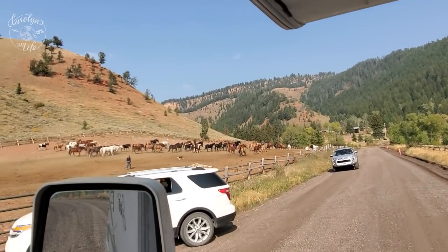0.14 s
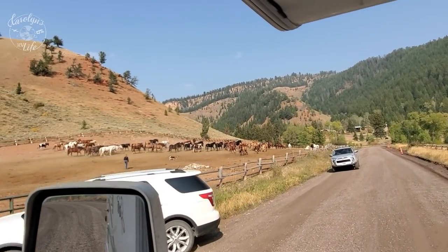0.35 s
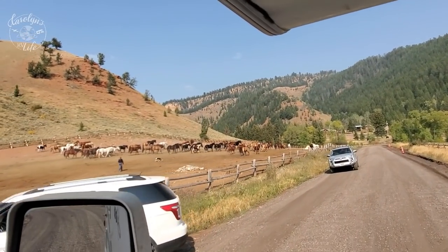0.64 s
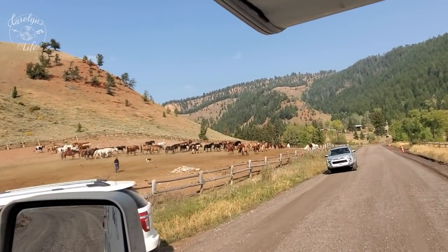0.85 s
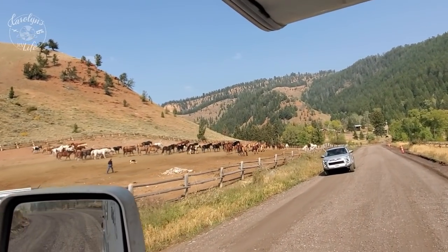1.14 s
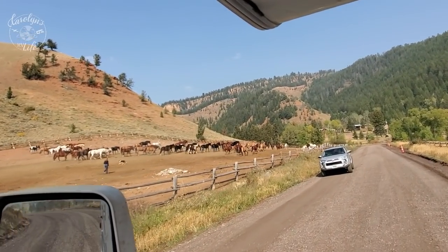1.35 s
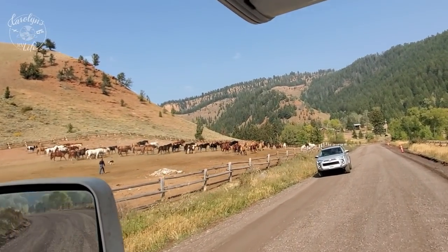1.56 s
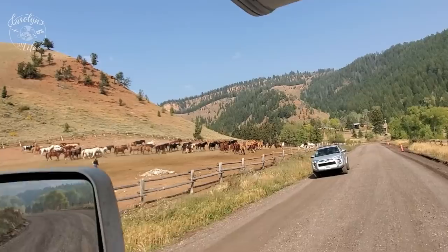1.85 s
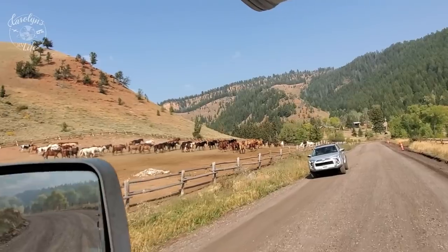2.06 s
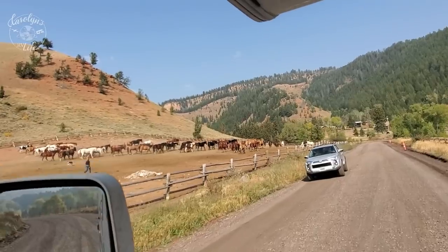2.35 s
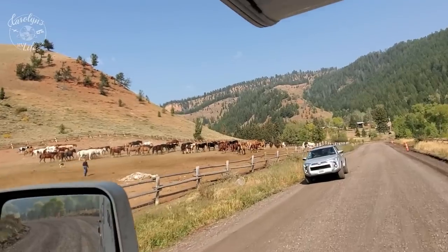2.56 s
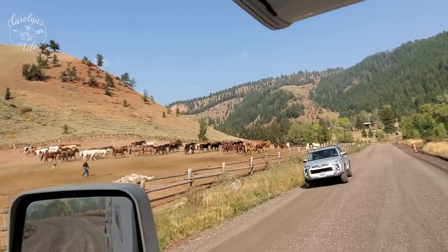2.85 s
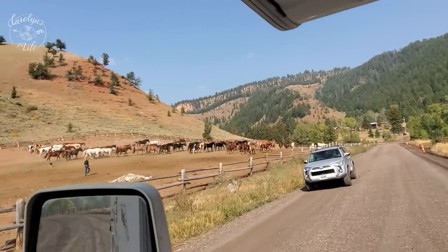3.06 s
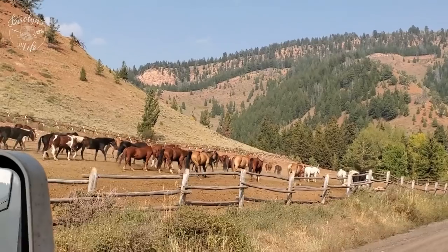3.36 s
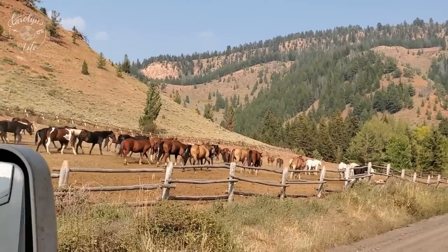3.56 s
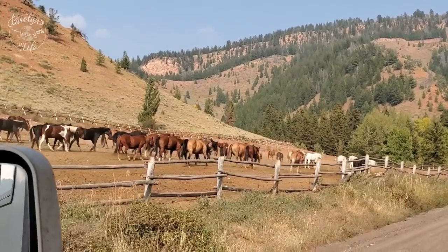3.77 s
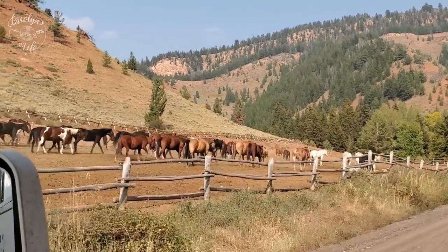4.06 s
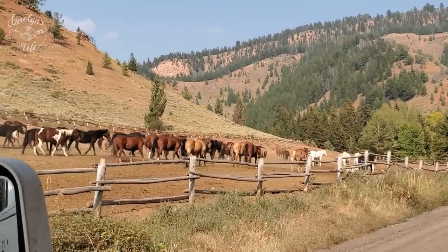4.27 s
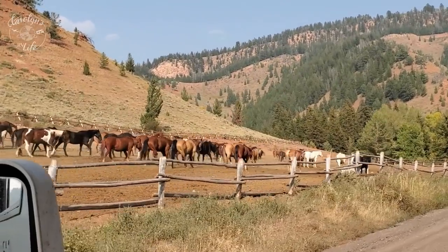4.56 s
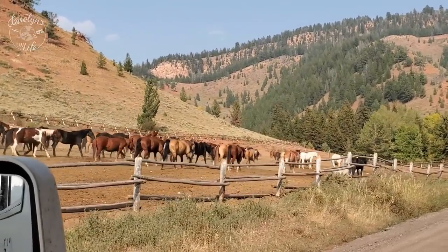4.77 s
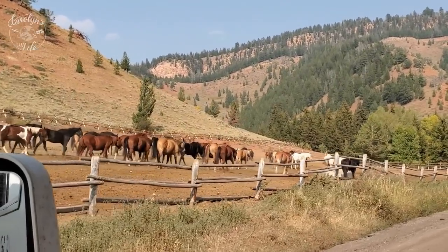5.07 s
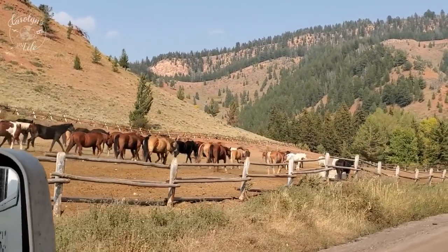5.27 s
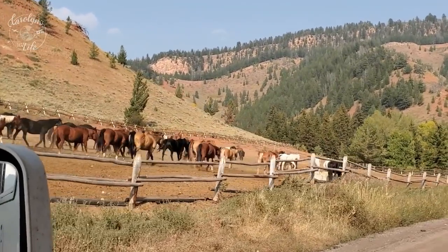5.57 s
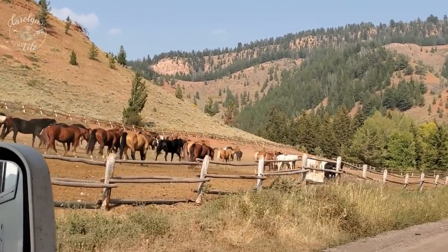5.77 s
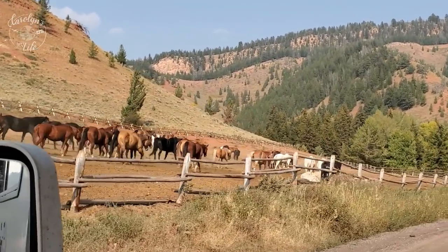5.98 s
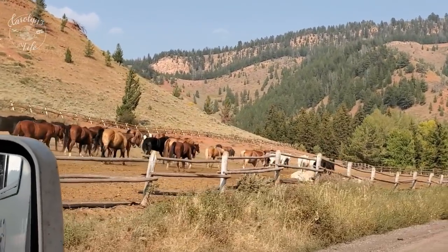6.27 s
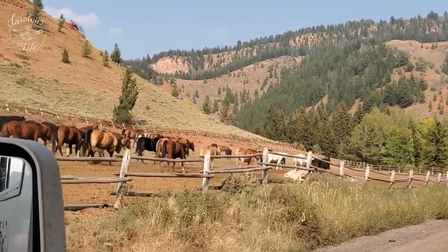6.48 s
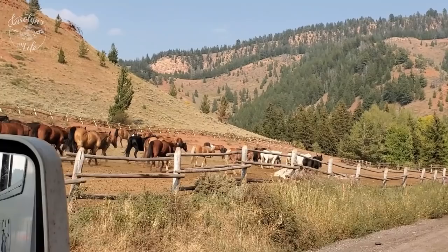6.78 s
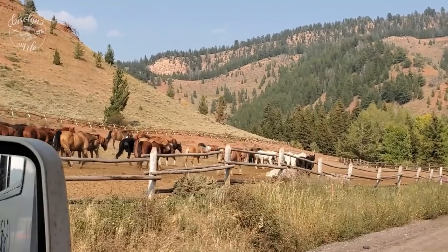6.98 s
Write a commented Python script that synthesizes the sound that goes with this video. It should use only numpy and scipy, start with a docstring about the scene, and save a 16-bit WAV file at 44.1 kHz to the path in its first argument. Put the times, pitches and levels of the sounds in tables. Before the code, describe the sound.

Inside a vehicle cab, a low engine drone and body rumble sit under the crunch and pop of gravel beneath the tyres. The drive starts slowly, with dull thumps and gusts on the microphone through the open window, then the engine swells. After a click, the pace is a little quicker. Nearby trim ticks throughout, and fittings knock and faintly squeak, with one sharp knock near the end.

```python
"""Motorhome cab on a gravel road

From a seat by the open side window, on a two-port stereo microphone. The engine takes up load and booms,
tyres grind over stones, the body thumps and knocks, and loose trim ticks, creaks and squeaks close by.
Gusts through the window buffet the microphone, most of all at the start. At 3.25 s the sound jumps,
with a click, from a crawl to a slightly faster and brighter stretch of road."""
import sys
import numpy as np
from scipy import signal
from scipy.fft import rfft, irfft, next_fast_len
from scipy.io import wavfile
from scipy.ndimage import uniform_filter1d

SR = 44100
rng = np.random.default_rng(int(sys.argv[2]) if len(sys.argv) > 2 else 0)


def digitize_waveform(pressure):
    """Quantize a signal to 16-bit integers and store it at the path in sys.argv[1].

    Rows of a 2-D input are taken as channels; values are limited to [-1, 1].
    """
    field = np.atleast_2d(pressure).T
    bounded = np.clip(field, -1, 1)
    quanta = np.round(bounded * 32767).astype(np.int16)
    wavfile.write(sys.argv[1], SR, quanta)


N = 314595
T = np.arange(N) / SR
SIZE = next_fast_len(N + 4096, True)
FREQS = np.maximum(np.arange(SIZE // 2 + 1) * SR / SIZE, 1)
JUMP_S = 3.25  # the faster stretch begins
CRUISE_HZ = 54  # engine firing rate when cruising
PORT_LAG_S = np.array([[0], [0.00024]])  # sound reaches the left port first


def undb(db):
    """Decibels to gain."""
    return 10 ** (np.asarray(db) / 20)


def unit(x):
    """Scale to rms 1."""
    return x / np.sqrt(np.mean(x ** 2))


def curve(rows):
    """Each column of a table, joined by straight lines in time."""
    times, *columns = np.transpose(rows)
    return [np.interp(T, times, column) for column in columns]


def across(points):
    """Values joined by straight lines on a log-frequency axis."""
    hz, value = np.transpose(points)
    return np.interp(np.log(FREQS), np.log(hz), value)


def colour(x, points):
    """Filter by a spectrum of (frequency [Hz], level [dB]) points."""
    return irfft(rfft(x, SIZE) * undb(across(points)), SIZE)[..., :N]


def walk(rate):
    """Random levels held 1 / rate s and slewed twice; spread near 1."""
    hold = int(SR / rate)
    steps = np.repeat(rng.standard_normal(N // hold + 1), hold)
    return 1.15 * uniform_filter1d(uniform_filter1d(steps, hold), hold)[:N]


def pan(db):
    """Left and right gains for a level difference, left minus right."""
    return undb(np.array([[db], [-db]]) / 2)


def add(track, s, sound):
    """Mix a short sound into a track at time s."""
    i = max(int(s * SR), 0)
    track[..., i:i + sound.shape[-1]] += sound[..., :max(N - i, 0)]


def arrive(track, s, sound):
    """Mix a short sound into both ports, the right one slightly later."""
    pair = np.broadcast_to(sound, (2, sound.shape[-1]))
    for port in range(2):
        add(track[port], s + PORT_LAG_S[port, 0], pair[port])


# Likeness of the two microphone ports: (frequency [Hz], coherence [0-1])
PORT_COHERENCE = [(50, 0.86), (110, 0.79), (170, 0.89), (230, 0.74), (320, 0.92), (620, 0.99), (1000, 0.82),
                  (1500, 0.42), (2500, 0.048), (6000, .03)]
def ports(three_noises):
    """One shared field reaches the left port first; each port also hears its own cab reflections."""
    shared = np.clip(across(PORT_COHERENCE), 0, 1)
    spectra = rfft(three_noises, SIZE)
    lag = np.exp(-2j * np.pi * FREQS * PORT_LAG_S)
    return irfft(np.sqrt(shared) * spectra[0] * lag + np.sqrt(1 - shared) * spectra[1:], SIZE)[:, :N]


# The driver lifts off, then takes up load again: (time [s], firing rate [Hz], level [dB])
ENGINE_LOAD = [(0, 52, -34.5), (.35, 44.3, -56), (1.3, 46.87, -52), (1.43, 47.57, -40), (2.0, 49.88, -33.5),
               (2.7, 52.29, -31), (3.18, 51.8, -31.5), (3.28, 54.48, -29.5), (5.0, 54.46, -28.5),
               (6.3, 53.85, -28.5), (7.13, 53.94, -27.5)]
# Engine lines at the seat: (multiple of the firing rate, relative level [dB], waver [dB])
ENGINE_ORDERS = [(1, 1.1, 1.3), (1.75, -19.5, 7.5), (2, -14, 1), (2.25, -28, 6.5), (2.75, -29, 13),
                 (3, -24, -2), (3.25, -16, 2)]
def engine():
    """The firing rate booms in the cab; weaker lines waver above it."""
    firing_hz, db = curve(ENGINE_LOAD)
    phase = 2 * np.pi * np.cumsum(firing_hz) / SR + 0.17 * walk(25)
    phase = phase - 2 * np.pi * firing_hz * PORT_LAG_S
    out = 0
    for order, line_db, waver_db in ENGINE_ORDERS:
        gain = undb(line_db + waver_db * np.minimum(walk(14), 1))
        out = out + gain * np.sin(order * phase + 2 * np.pi * rng.random())
    return np.sqrt(2) * out * undb(db) * pan(-0.25)


# Boom of the body panels all round the microphone: (frequency [Hz], relative level [dB])
BOOM_SPECTRUM = [(18, -5), (32, -9), (45, -1), (75, 4), (100, 0), (160, -4), (200, -11.5), (260, -18),
                 (400, -58.5)]
def boom(cruise_db=-35.5, db_per_hz=0.6, uneven_db=0.5, uneven_db_per_hz=0.18):
    """Ruts shake the body panels: harder with speed, and in more separate jolts at a crawl."""
    slower_hz = CRUISE_HZ - curve(ENGINE_LOAD)[0]
    flutter_db = (uneven_db + uneven_db_per_hz * slower_hz) * walk(18)
    db = cruise_db - db_per_hz * slower_hz + jolts() + flutter_db
    shake = unit(colour(ports(rng.standard_normal((3, N))), BOOM_SPECTRUM))
    return shake * undb(db) * pan(1.0)


# Tyres on looser or firmer gravel, below the cab: (time [s], level [dB])
TYRE_LEVEL = [(0, -41.5), (.6, -44.5), (1.0, -45), (1.45, -44), (1.85, -41.5), (3.3, -42), (4.5, -41),
              (5.6, -42.5), (7.13, -42.5)]
# Slow crunch, faster crunch and fine grit, from the seat: (frequency [Hz], relative level [dB])
SLOW_CRUNCH = [(140, -32), (230, -1), (300, 1.5), (380, -0.5), (600, -1.5), (740, -1.5), (950, -11),
               (1200, -8.5), (1450, -14.5), (1700, -14), (2100, -20), (3000, -30.5), (5000, -43.5)]
FAST_CRUNCH = [(140, -48), (220, -5), (310, 1), (390, -1.5), (620, 1), (730, -5), (900, 0), (1050, -5),
               (1300, -11), (1600, -15), (2200, -20.5), (3000, -29), (5000, -50.5)]
GRIT_SPECTRUM = [(1000, -16), (2200, 4.5), (3000, 4), (3700, 0), (4500, -2.5), (5500, -7.5), (6700, -6),
                 (7600, -34), (10000, -19.5), (16000, -12)]
def gravel(lumpy_db=1.27, grit_slow_db=-62, grit_fast_db=-64.5, grit_follows=0.92):
    """Stones crunch, heard through the cab, with fine grit above; loose patches come and go."""
    road_db = curve(TYRE_LEVEL)[0]
    crunch = ports(stones(per_s=1000, spread_db=2.2, ring_s=.006))
    slow = unit(colour(crunch, SLOW_CRUNCH)) * pan(1.0)
    fast = unit(colour(crunch, FAST_CRUNCH)) * pan(2.1)
    grit = unit(colour(ports(stones(per_s=1700, spread_db=4.0, ring_s=0.01)), GRIT_SPECTRUM))
    grit_db = np.where(T < JUMP_S, grit_slow_db, grit_fast_db)
    grit_db += grit_follows * (road_db - road_db.mean())
    patches = undb(lumpy_db * walk(14))
    road = np.where(T < JUMP_S, slow, fast * patches) * undb(road_db)
    return road + grit * patches * undb(grit_db) * pan(1.8)


def stones(per_s, spread_db, ring_s):
    """Stones of uneven size snap under the tyres; each gives a short burst of noise."""
    sizes = undb(spread_db * np.minimum(rng.exponential(size=N), 5))
    snaps = sizes * (rng.random(N) < per_s / SR)
    power = signal.lfilter([1], [1, -np.exp(-2 / (ring_s * SR))], snaps ** 2)
    return unit(np.sqrt(power) * rng.standard_normal((3, N)))


def pops(per_s=70, low_hz=453, high_hz=2470, under_db=3, spread_db=1.3, muffle_db_per_oct=7):
    """Single stones pop from under the tyres, each at its own pitch; the cab muffles the higher ones."""
    out, t = np.zeros((2, N)), T[:SR // 25]
    road_db = curve(TYRE_LEVEL)[0]
    for when, pitch, size, side in rng.random((int(per_s * N / SR), 4)):
        i, octaves = int(when * N), pitch * np.log2(high_hz / low_hz)
        cycles = low_hz * 2 ** octaves * t
        size_db = spread_db * min(-np.log(1 - size), np.pi)
        db = road_db[i] - under_db - muffle_db_per_oct * octaves + size_db
        pop = np.sin(2 * np.pi * cycles) * (1 - np.exp(-2 * cycles)) * np.exp(-cycles / 2.9)
        arrive(out, T[i], pop * undb(db) * pan(2 + 4 * (2 * side - 1)))
    return out


# Steady bass at the two ports: (time [s], left gain [dB], right gain [dB])
BASS_GAIN = [(0, 0, -20), (.64, -2, -18), (.7, 0, -5), (1.15, -2, -3), (1.45, 0, 0.5)]
def thin_bass(x, edge_hz=220):
    """Early in the crawl the steady bass is thin, at first almost gone on the right."""
    bass = signal.sosfiltfilt(signal.butter(3, edge_hz, fs=SR, output="sos"), x)
    return x + bass * (undb(curve(BASS_GAIN)) - 1)


# Dull low thumps: (time [s], level [dB], pitch [Hz], left minus right [dB]); those at 0.245 s and 0.487 s are
# puffs # of wind on the left port, heard almost only on the left
LOW_THUMPS = [(0.158, -24, 95, 2), (0.163, -26, 187, 2), (0.245, -26, 68.5, 18), (0.315, -31, 95, 4),
              (0.487, -37.5, 78, 18), (0.68, -32.5, 87, 4), (0.752, -27, 76.6, 2), (0.785, -26.5, 87, 2),
              (0.869, -32, 72, 1), (1.046, -33.5, 149, 4), (1.116, -29, 111, -9), (1.205, -31, 85, 3),
              (1.31, -29.5, 90, -1), (1.779, -27.5, 109, 2), (4.249, -24, 105, 6), (4.56, -25, 110, 1)]
def thumps(swell_s=0.0086, gain_db=-2.5):
    """Low, heavily damped thumps."""
    out, t = np.zeros((2, N)), T[:SR // 4]
    envelope = t / swell_s * np.exp(1 - t / swell_s)
    for s, db, hz, pan_db in LOW_THUMPS:
        add(out, s, envelope * np.sin(2 * np.pi * hz * t) * undb(db + gain_db) * pan(pan_db))
    return out


# Fittings knocking across the cab: (time [s], level [dB], centre [Hz], left minus right [dB])
FITTING_KNOCKS = [(0.08, -28.5, 480, -3), (0.104, -27, 503, 3), (0.219, -33.5, 1190, -1.5),
                  (0.383, -37.5, 1400, 0), (0.3895, -24.5, 464, -6), (0.408, -30.5, 420, -8),
                  (0.733, -41.5, 1100, 3), (1.261, -35, 790, 4), (2.053, -38, 596, 0),
                  (2.198, -33.5, 630, 2.5), (3.149, -38, 640, 1.5), (4.078, -30, 950, 7),
                  (4.193, -34, 1708, 4), (4.455, -28.5, 798, 5.5), (4.525, -27.5, 532, 2),
                  (4.583, -31, 880, 5), (4.953, -39, 700, 0), (5.038, -30, 622, 3), (5.154, -21.5, 631, 2),
                  (5.377, -31.5, 900, 2), (6.323, -16, 735, 5.5), (6.334, -28, 660, -3),
                  (6.382, -35, 700, 3)]
# What the fittings ring with: (frequency [Hz], relative level [dB], t60 [s])
FITTING_MODES = [(324, 10.5, 0.053), (411, 11, 0.044), (506, 3, 0.068), (622, -2.5, 0.045), (745, 0, .035),
                 (836, 3.5, 0.034), (960, -5.5, 0.046), (1123, -2, 0.037), (1345, -13.5, 0.035),
                 (1434, -7.5, 0.058), (2195, -9, 0.04)]
def knocks(below_oct=0.3, above_oct=1.0, rise_s=0.001, gain_db=-2.9, crack_db=-17, crack_s=0.0054):
    """Fittings knock with a short crack; each blow favours the modes near its own centre."""
    out, t = np.zeros((2, N)), T[:SR // 5]
    hz, mode_db, t60 = np.transpose(FITTING_MODES)[:, :, None]
    crack_band = signal.butter(3, [1000, 2300], "band", fs=SR, output="sos")
    for s, db, centre_hz, pan_db in FITTING_KNOCKS:
        octaves = np.log2(hz / centre_hz)
        reach = np.where(octaves < 0, below_oct, above_oct)
        weight = undb(mode_db) * np.exp(-(octaves / reach) ** 2 / 2)
        phase = 2 * np.pi * (hz * t + rng.random(hz.shape))
        ring = np.sum(weight * np.sin(phase) * undb(-60 * t / t60), axis=0) * (1 - np.exp(-t / rise_s))
        ring /= 2 * np.std(ring[:SR // 80])  # peak near 1
        crack = unit(signal.sosfilt(crack_band, rng.standard_normal(len(t)))) * np.exp(-t / crack_s)
        arrive(out, s, (ring + undb(crack_db) * crack) * undb(db + gain_db) * pan(pan_db))
    return out


# Gusts through the window: (peak time [s], length [s], level [dB], left minus right [dB])
WINDOW_GUSTS = [(0.096, 0.23, -42, 22), (0.39, 0.34, -46, 23), (0.174, 0.029, -27, 1),
                (2.48, 1.0, -41, 2.5), (6.25, 0.21, -36, 6)]
# Buffeting right on the microphone: (frequency [Hz], relative level [dB])
BUFFET_SPECTRUM = [(18, -14), (45, -3), (85, 1.5), (160, -6), (320, -14.5), (700, -25.5), (2000, -45),
                   (6000, -92)]
def wind(uneven_db=0.5):
    """Gusts swell and fade; each port is buffeted by its own eddies."""
    eddies = np.array([rng.standard_normal(N) * undb(uneven_db * walk(30)) for _ in range(2)])
    power = sum((undb(db) * pan(pan_db)) ** 2 * np.exp(-(2 * (T - s) / length) ** 2)
                for s, length, db, pan_db in WINDOW_GUSTS)
    return unit(colour(eddies, BUFFET_SPECTRUM)) * np.sqrt(power)


# The clearest ticks of loose trim, close by: (time [s], level [dB], chatter length [s])
TRIM_TICKS = [(.3195, -55, .016), (0.3706, -52, .016), (0.665, -44.5, 0.0093), (0.869, -47.5, 0.007),
              (0.912, -49.5, 0.013), (0.9607, -46.5, .011), (1.123, -48, .018), (1.177, -52, 0.013),
              (1.2075, -45, 0.011), (1.3227, -43.5, .019), (1.5625, -44.5, 0.0053), (1.6984, -43, 0.0045),
              (1.8985, -42, 0.007), (2.0395, -41, 0.0042), (2.085, -43, 0.021), (2.2796, -43.5, 0.0036),
              (2.421, -45, 0.0056), (2.4665, -43, 0.0067), (2.5045, -44.5, 0.011), (2.7928, -45, .004),
              (2.8797, -44, 0.0039), (2.918, -44.5, 0.01), (3.3111, -50, .008), (3.4519, -46, .007),
              (3.9431, -49, .008), (4.14, -48, .008), (4.2588, -44, .017), (4.745, -54, .006),
              (4.9547, -49.5, .012), (5.1134, -45, .008), (5.1683, -45, 0.018), (5.4209, -46.5, .012),
              (5.9674, -47, .012), (6.2195, -44, 0.011), (6.2521, -45, .015), (6.2927, -50, 0.014),
              (6.7248, -47.5, .008), (6.921, -44, .016), (6.985, -53, .02), (7.0805, -50, 0.0076)]
# What the trim rings with: (frequency [Hz], gain [dB])
TRIM_SPECTRUM = [(2500, -9), (3900, 1.5), (4700, 7), (5150, -1.5), (5550, -1.5), (6100, -5.5), (8000, -8),
                 (10300, -3), (11400, 1.5), (12400, -2), (13200, -2), (15500, -1)]
# A looser piece that rings on the slow stretch only: (frequency [Hz], relative level [dB], t60 [s])
LOOSE_MODES = [(2270, 0, .014), (2920, -5, .012), (3380, 1.5, 0.015), (3710, 4, 0.019), (4730, -1, 0.015)]
def trim(contact_s=0.0021, rebound_s=0.0038, fade_db=1.4, gain_db=0.04, tremble_per_s=54):
    """Loose trim chatters: a sharp contact, then rebounds until it settles."""
    force, rings, t = np.zeros(N), np.zeros((2, N)), T[:SR // 30]
    hz, mode_db, t60 = np.transpose(LOOSE_MODES)[:, :, None]
    for s, db, length in TRIM_TICKS:
        for k, (when, softness) in enumerate(rng.random((6, 2))):
            at = s + rebound_s * (k + min(k, 1) * (when - .5) / 2)
            unsettled = np.clip(length / rebound_s - k, 0, 1)
            blow = undb(db + gain_db - 2.8 * softness - fade_db * k) * unsettled
            add(force, at, blow * np.exp(-t / contact_s))
            # each contact lands on another spot, so the ring differs a little
            ring_hz = hz * (1 + .018 * rng.standard_normal(hz.shape))
            phase = 2 * np.pi * (ring_hz * t + rng.random((2, len(hz), 1)))
            ring = np.sum(undb(mode_db - 60 * t / t60) * np.sin(phase), axis=1)
            add(rings, at, ring * blow * undb(-1) * (s < JUMP_S))
    # between the ticks it keeps trembling faintly
    touches = rng.random(N) < tremble_per_s / SR
    tremble = touches * undb(-60 + 3 * np.minimum(rng.standard_normal(N), 1))
    force += signal.lfilter([1], [1, -np.exp(-1 / (contact_s * SR))], tremble)
    return colour(force * rng.standard_normal((2, N)), TRIM_SPECTRUM) * pan(-0.68) + rings / 2


def jolts(jolt_s=0.012, full_db=-44, db_per_hz=0.5):
    """Lift of the boom in dB at each bump that sets the trim ticking, larger at a lower firing rate."""
    slower_hz = np.maximum(CRUISE_HZ - curve(ENGINE_LOAD)[0], 0)
    swell = sum(undb(db - full_db) * np.exp(-((T - s - jolt_s / 2) / jolt_s) ** 2)
                for s, db, _ in TRIM_TICKS)
    return db_per_hz * slower_hz * np.minimum(swell, 1)  # the springs limit the hardest


# Short scrapes and gravel crunches, to the left: (time [s], length [s], centre [Hz], level [dB])
SHORT_SCRAPES = [(0.203, 0.057, 1130, -49), (.305, .08, 9700, -66), (.312, .05, 13800, -62),
                 (0.35, 0.11, 1390, -51), (0.652, 0.05, 1300, -51.5), (3.7, 0.1, 1988, -48),
                 (4.039, .12, 890, -46.5), (4.455, 0.089, 739, -43), (5.046, 0.037, 2230, -57),
                 (5.16, 0.083, 690, -41.5), (5.786, .035, 1400, -50), (6.315, 0.033, 2000, -49),
                 (6.83, 0.046, 1447, -50)]
def scrapes(band_ratio=1.2, grain_db=4.0):
    """Uneven rubbing that swells and fades within one band."""
    out, grain = np.zeros((2, N)), unit(undb(grain_db * walk(150)))
    for s, length, hz, db in SHORT_SCRAPES:
        t = T[:int(length * SR)]
        band = signal.butter(2, [hz / band_ratio, hz * band_ratio], "band", fs=SR, output="sos")
        rub = unit(signal.sosfilt(band, rng.standard_normal(SR // 4)))[:len(t)]
        arrive(out, s, rub * np.sin(np.pi * t / length) * undb(db))
    return out * grain * pan(4.6)


def creak(at_s=3.33, length_s=.085, from_hz=258, to_hz=300, db=-42, jitter=.04):
    """One short rising creak: uneven slips that come faster and faster ring a panel."""
    out, t = np.zeros((2, N)), T[:int(length_s * SR)]
    slip_hz = (from_hz + (to_hz - from_hz) * t / length_s) * (1 + jitter * walk(200)[:len(t)])
    slips = np.diff(np.floor(np.cumsum(slip_hz) / SR), prepend=0)
    panel_band = signal.butter(2, [760, 1200], "band", fs=SR, output="sos")
    ring = unit(signal.sosfilt(panel_band, slips))
    arrive(out, at_s, ring * np.sin(np.pi * t / length_s) * undb(db))
    return out


def panel(hz=305, width_hz=36, cruise_db=-57, db_per_hz=0.5, wakes_hz=49.3, swell_db=14.5):
    """Road shake rings one narrow cab resonance; it swells as the firing rate passes wakes_hz."""
    firing_hz, _ = curve(ENGINE_LOAD)
    swell = np.exp(-((firing_hz - wakes_hz) / 0.58) ** 2 / 2)
    db = cruise_db + db_per_hz * (firing_hz - CRUISE_HZ) + swell_db * swell
    b, a = signal.iirpeak(hz, hz / width_hz, SR)
    return unit(signal.lfilter(b, a, signal.lfilter(b, a, rng.standard_normal(N)))) * undb(db)


def click(db=-22.5, fall_s=0.00082, dull_hz=11000):
    """One click where the faster stretch begins."""
    out = np.zeros(N)
    add(out, JUMP_S, undb(db) * np.exp(-T[:SR // 50] / fall_s))
    return signal.lfilter(*signal.butter(1, dull_hz, fs=SR), out)


# Faint squeaks of fittings in the cab: (time [s], length [s], pitch [Hz], level [dB])
FITTING_SQUEAKS = [(2.88, .21, 2840, -61), (2.96, 0.077, 3515, -63), (4.32, 0.14, 3515, -66),
                   (4.55, 0.06, 3530, -68), (4.671, 0.084, 3505, -67), (6.051, .06, 3545, -67),
                   (6.293, 0.032, 3515, -57), (6.344, 0.048, 3515, -60), (6.425, .04, 3530, -58),
                   (6.8, 0.055, 3515, -68), (6.995, 0.039, 3530, -62), (7.06, .04, 3500, -68)]
def squeaks(width_hz=20, rasp_hz=260, rasp_db=-5, stutter_db=2, wander_rad=1.2):
    """Rubbing fittings sing at one narrow resonance, stuttering and rasping as the contact slips."""
    out = np.zeros((2, N))
    stutter = undb(stutter_db * walk(110))
    for side in out:
        sing = stutter * np.exp(1j * wander_rad * walk(2 * width_hz))
        rasp = (walk(2 * rasp_hz) + 1j * walk(2 * rasp_hz)) / np.sqrt(2)
        slip = sing + undb(rasp_db) * rasp
        for s, length, hz, db in FITTING_SQUEAKS:
            rub = slip[int(s * SR):][:int(length * SR)]
            t = T[:len(rub)]
            swell = undb(db) * np.sin(np.pi * t / length)
            add(side, s, swell * np.real(rub * np.exp(2j * np.pi * hz * t)))
    return out


# High hiss, mostly at the right port: (frequency [Hz], relative level [dB])
HISS_SPECTRUM = [(3000, -29), (7800, -14), (9500, -9.5), (11500, -5.5), (16000, -5)]
def hiss(mean_db=-71.0, follows=0.73):
    """Faint hiss at the very top that rises and falls with the tyres."""
    road_db = curve(TYRE_LEVEL)[0]
    noise = unit(colour(rng.standard_normal((2, N)), HISS_SPECTRUM))
    db = mean_db + follows * (road_db - road_db.mean()) + .5 * walk(3.1)
    return noise * undb(db) * pan(-7.5)


def scene():
    """Everything that reaches the seat by the window."""
    drive = thin_bass(engine() + boom() + gravel() + panel())
    cab = thumps() + knocks() + scrapes() + trim() + squeaks() + creak()
    return drive + pops() + cab + wind() + click() + hiss()


def record(dry):
    """The recorder cuts the top above 15.8 kHz."""
    return signal.sosfilt(signal.ellip(10, .2, 80, 15800, fs=SR, output="sos"), dry)


dry = scene()
out = record(dry)
digitize_waveform(out)
```